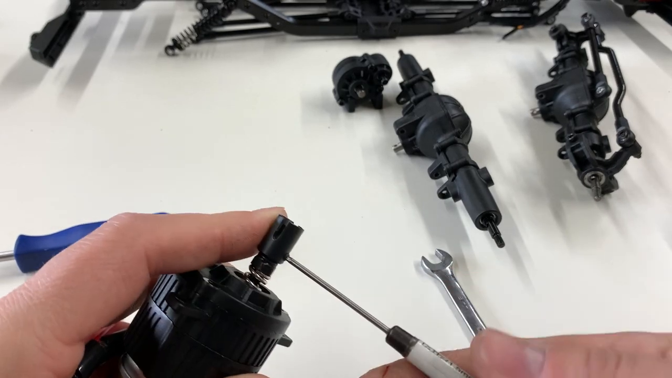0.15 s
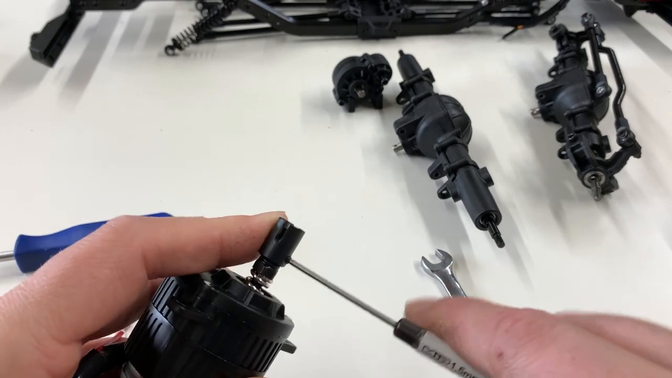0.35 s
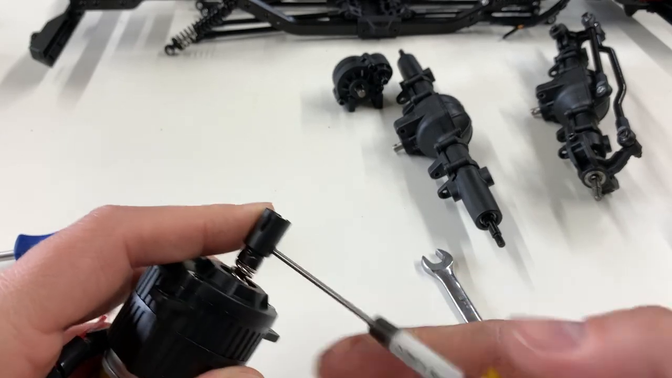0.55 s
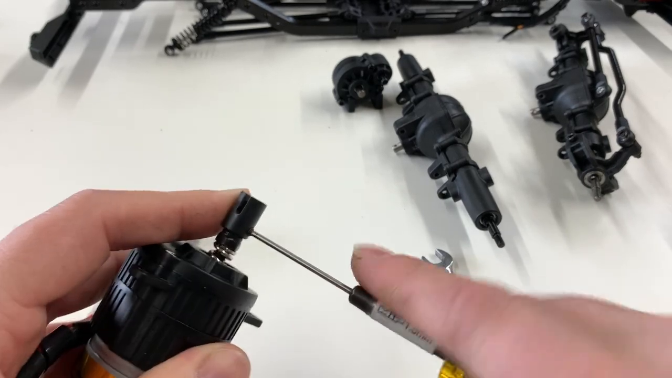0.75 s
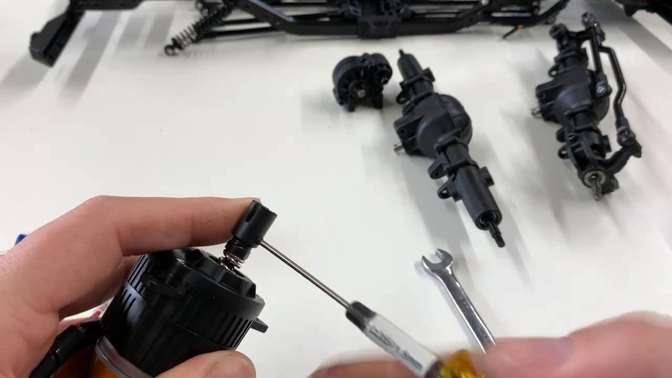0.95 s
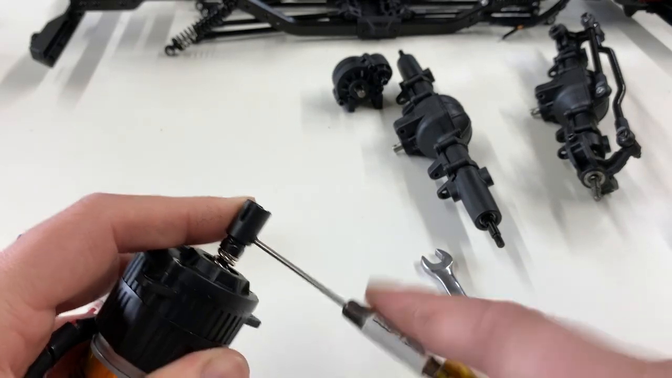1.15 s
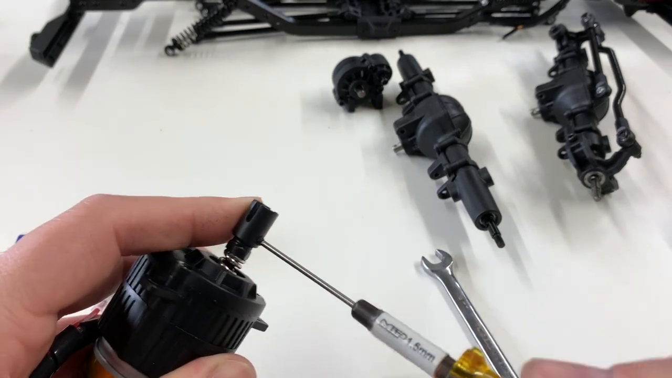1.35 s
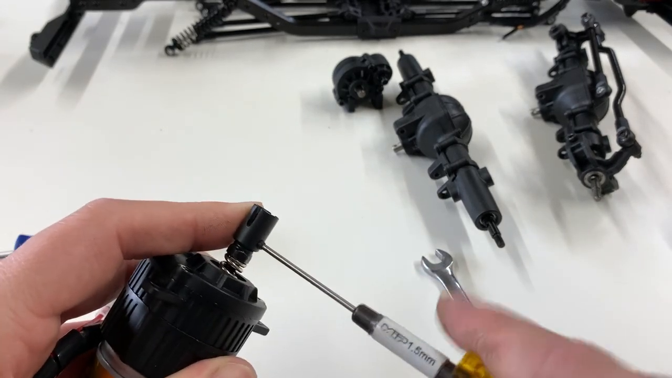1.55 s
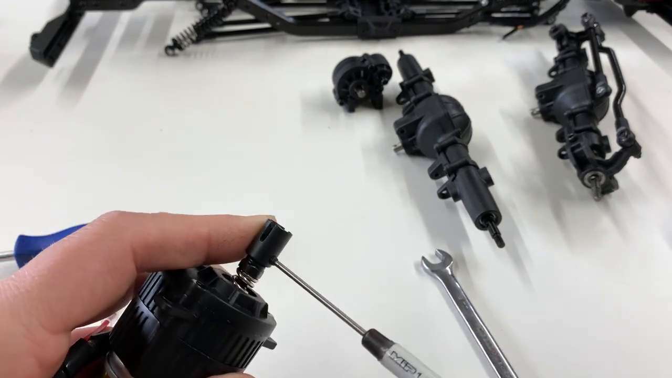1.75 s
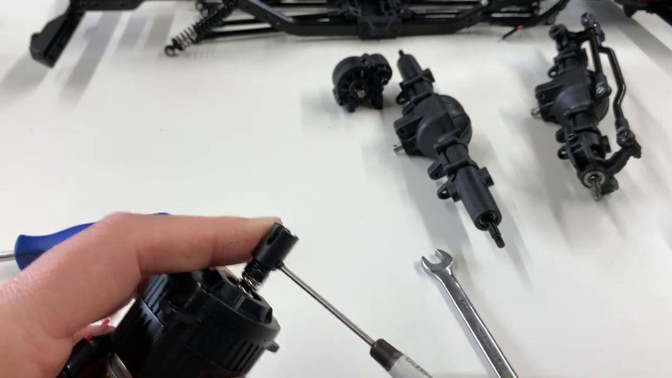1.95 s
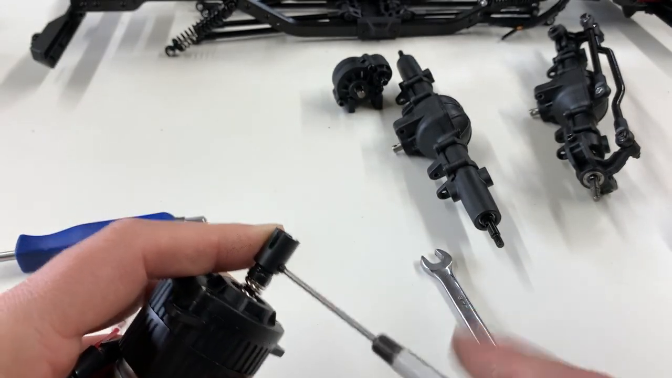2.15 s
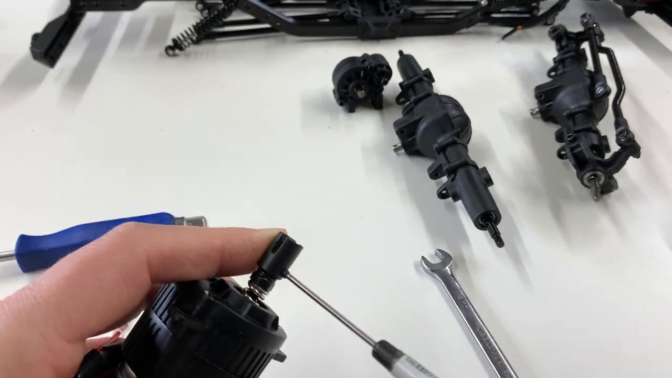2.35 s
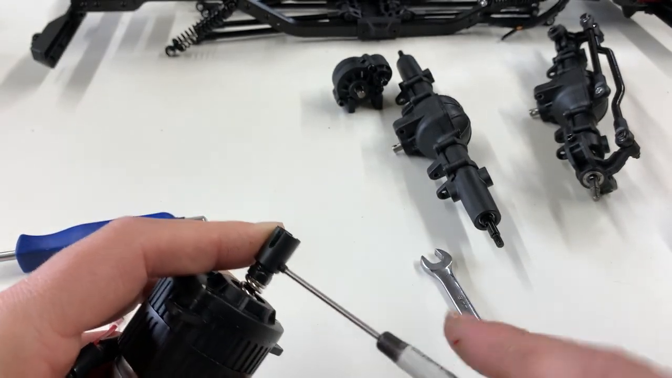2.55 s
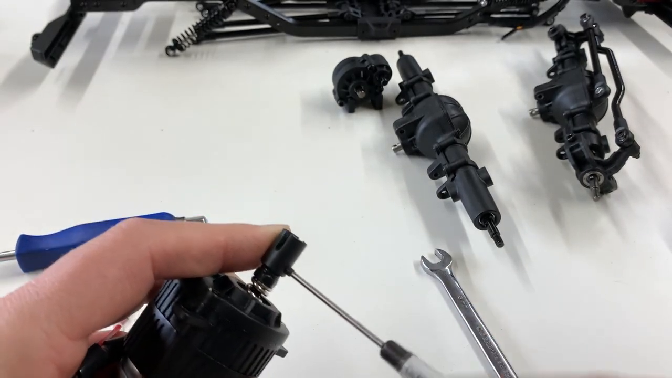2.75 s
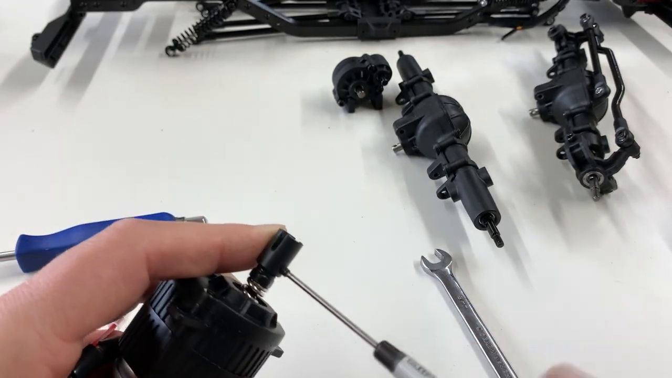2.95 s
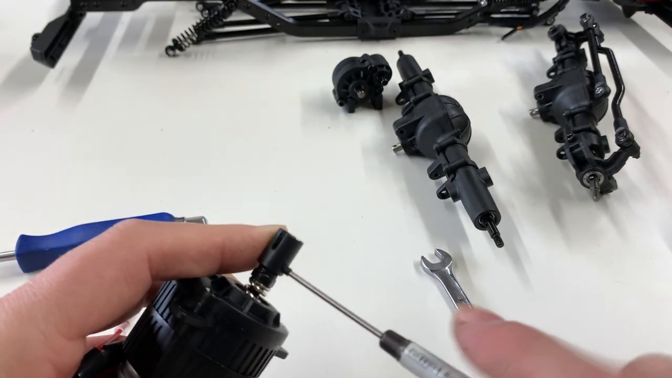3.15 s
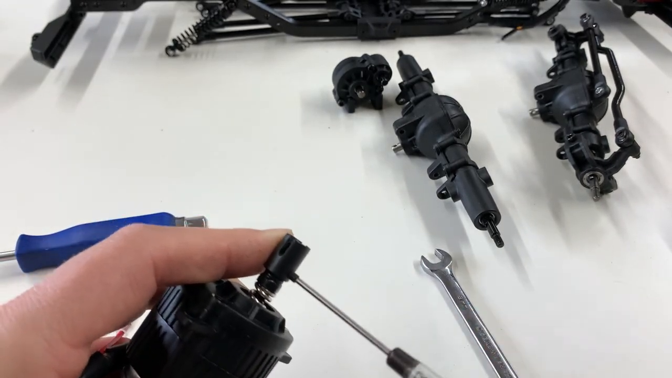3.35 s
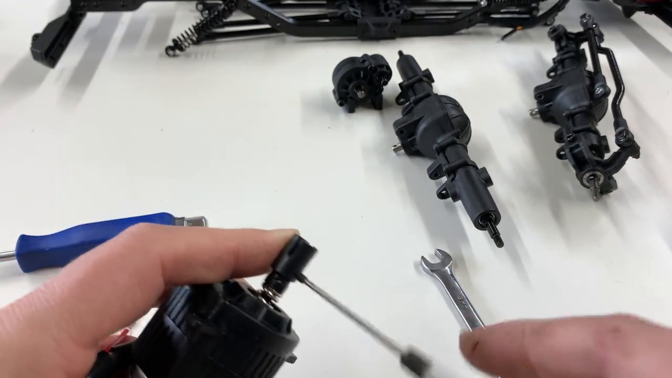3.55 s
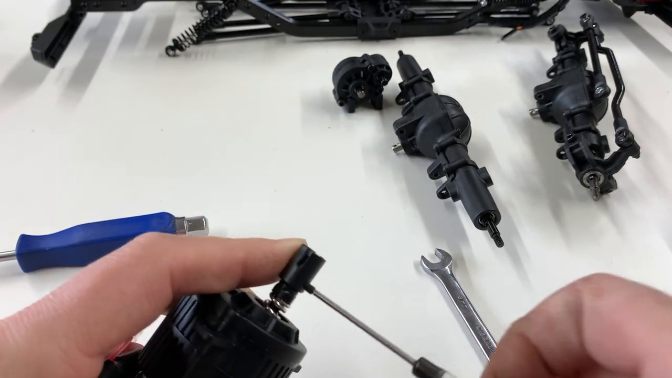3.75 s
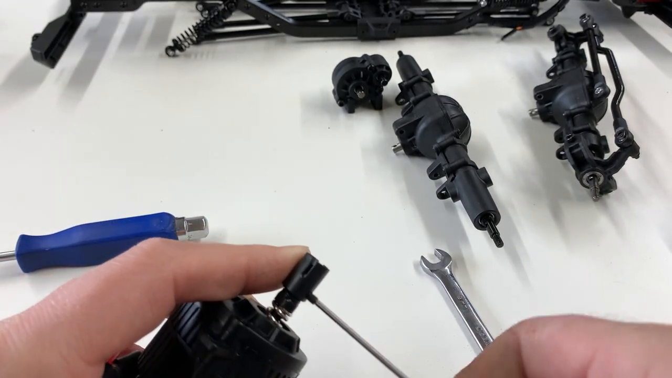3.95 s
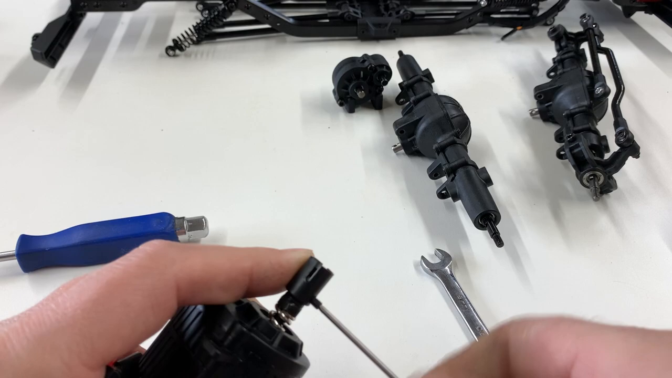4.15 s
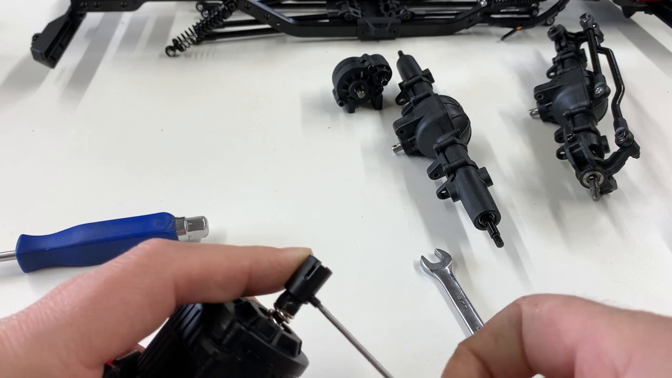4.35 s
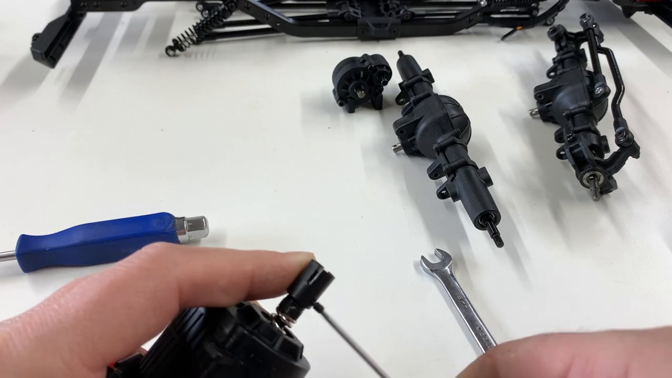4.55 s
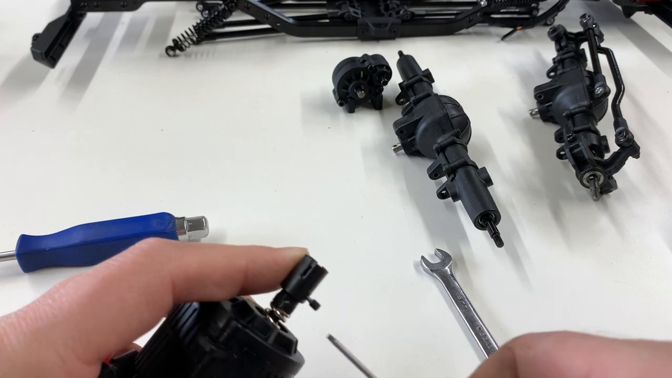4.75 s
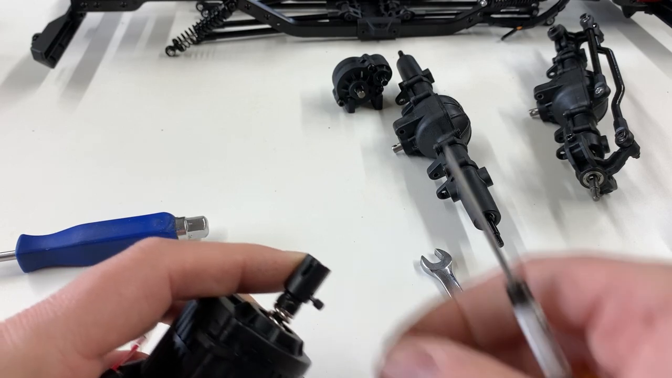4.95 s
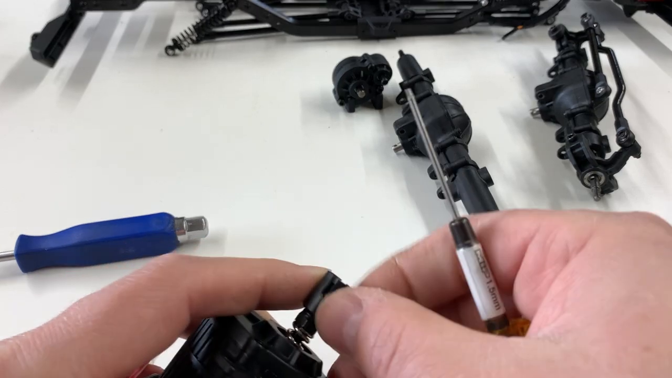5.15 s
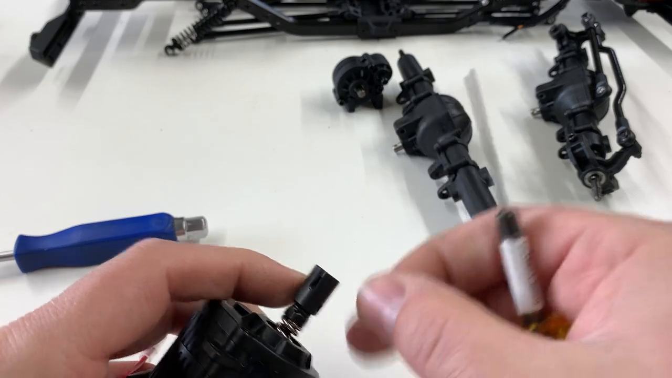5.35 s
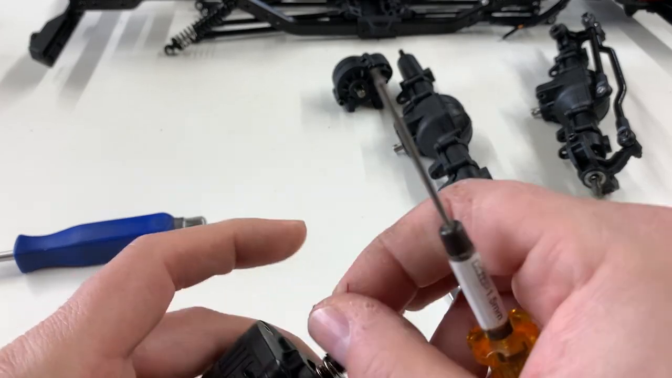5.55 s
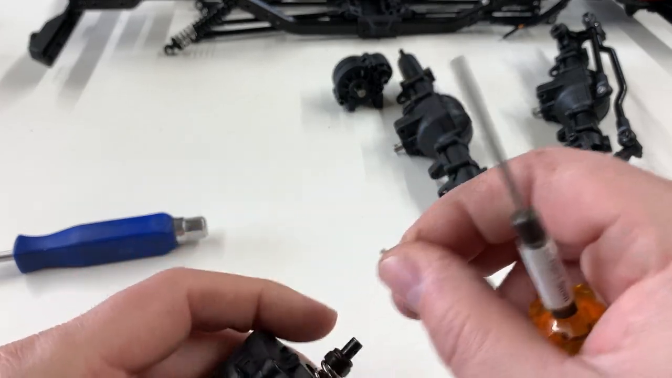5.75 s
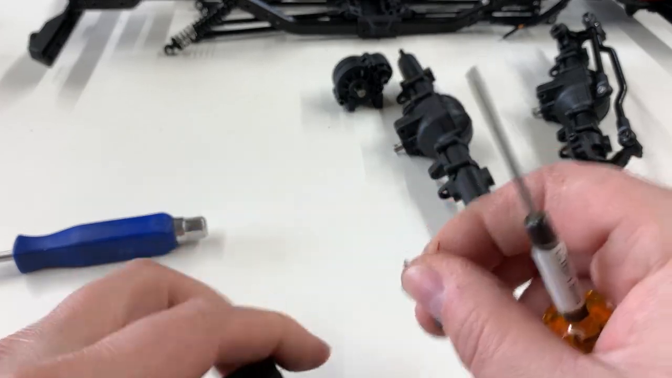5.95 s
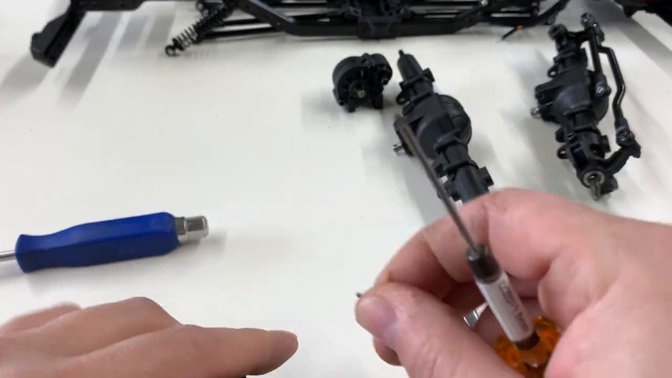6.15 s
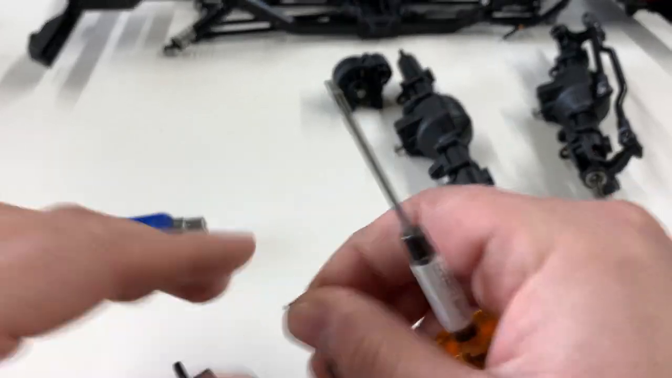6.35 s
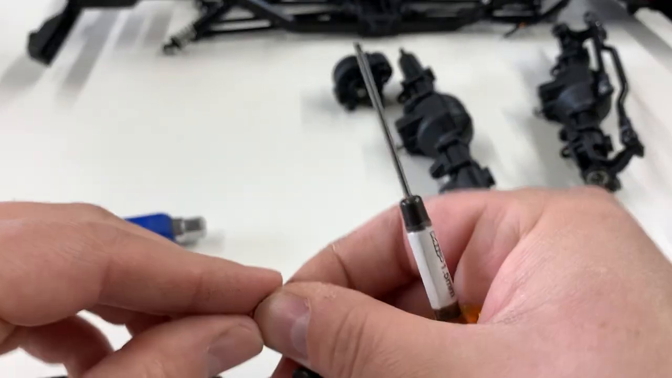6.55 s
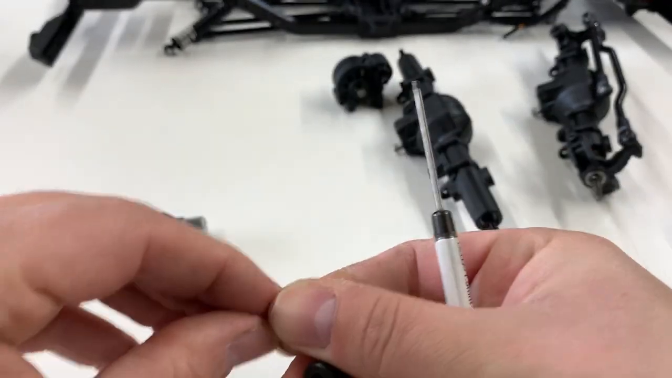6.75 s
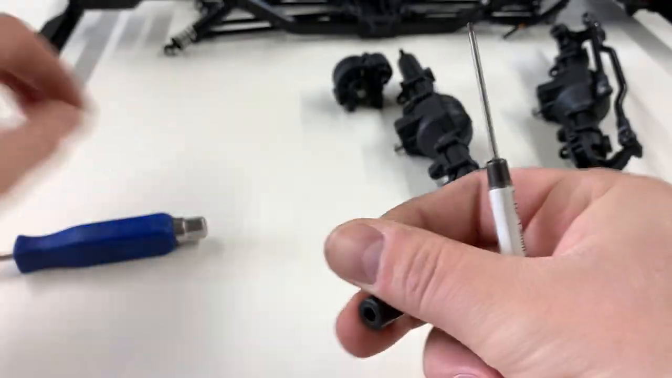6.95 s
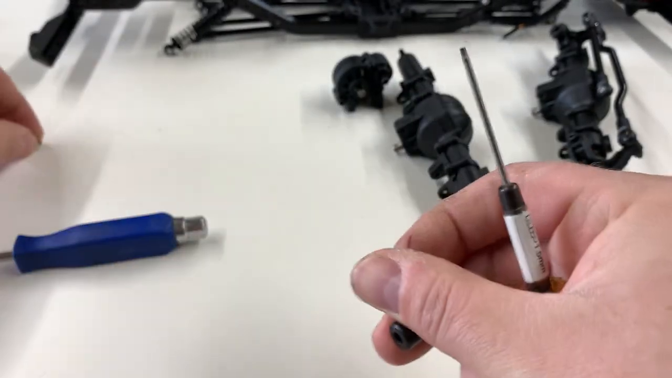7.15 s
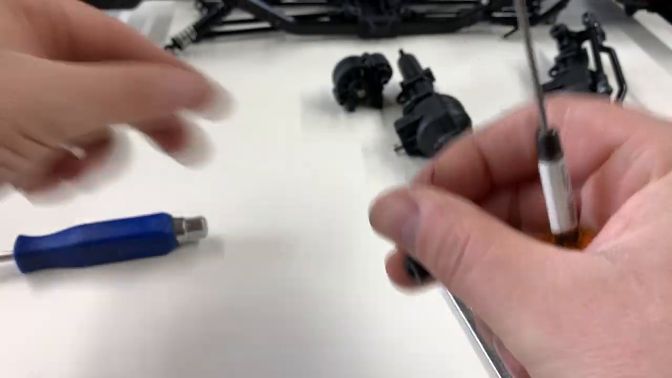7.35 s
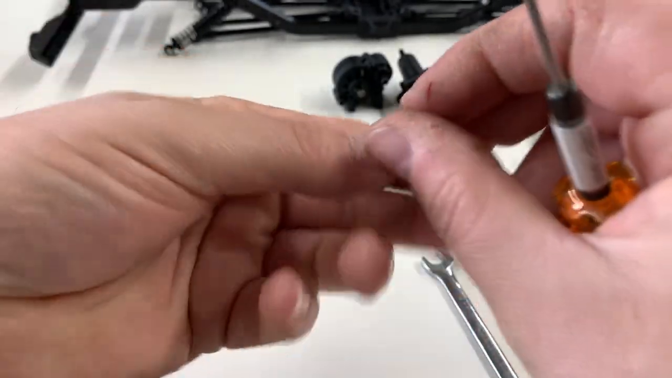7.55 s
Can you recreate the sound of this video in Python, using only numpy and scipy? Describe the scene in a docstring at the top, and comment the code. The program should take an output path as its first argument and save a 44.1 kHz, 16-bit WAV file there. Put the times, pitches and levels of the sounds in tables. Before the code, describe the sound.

A small hex driver backs a screw out of a plastic gearbox, giving light, irregular metallic clicks and then a few thin squeaks. The gearbox is set down on a workbench with a much louder clatter and knock. A smaller part follows, and the tiny screw drops and skitters. It sounds close, in a quiet room with a low hum.

```python
"""Unscrewing a small gearbox

In a quiet room a hex driver backs a tiny screw out of a plastic gearbox held over a workbench. The bit
clicks at each turn of the fingers and squeaks by stick-slip friction as it comes free. The gearbox is
set down with a clatter that excites the modes of the bench and of the steel parts on it; a small part
follows, then the screw drops and skitters. Faint tocks, rumble and hum lie underneath."""
import sys
import numpy as np
from scipy import signal
from scipy.fft import rfft, irfft
from scipy.io import wavfile
from scipy.ndimage import uniform_filter1d

SR = 44100
rng = np.random.default_rng(int(sys.argv[2]) if len(sys.argv) > 2 else 0)


def unload_wav(signal):
    """Save mono or channel-first audio to the path in sys.argv[1] as 16-bit WAV at rate SR, clipped to [-1, 1]."""
    wavfile.write(
        sys.argv[1],
        SR,
        np.round(np.clip(np.atleast_2d(signal).T, -1, 1) * 32767).astype(np.int16),
    )


N = 335160

# The bit takes up its play. Each row: start in seconds, relative steel and plastic levels in dB.
BIT_CLICKS = [(0.0975, -42.5, -66), (0.4377, -37.5, -57), (0.6115, -43, -62), (0.7891, -33, -60),
              (0.9039, -32.5, -53), (1.281, -39, -59), (1.4188, -44, -66), (1.5632, -59, -62.5),
              (1.6165, -37.5, -60), (1.6485, -56, -59), (1.7355, -43, -68), (1.8682, -35.5, -62),
              (2.04, -50.5, -67.5), (2.1265, -59, -61.5), (2.166, -41, -57.5), (2.3534, -47, -69),
              (2.521, -44, -59.5), (2.6632, -43, -67), (2.7205, -47.5, -61.5), (2.83, -49.5, -70),
              (2.851, -44.5, -59.5), (3.0041, -46, -71), (3.045, -54, -57.5), (3.056, -36, -60),
              (3.1435, -38.5, -62.5), (3.216, -59, -61), (3.49, -50, -61.5), (4.217, -57.5, -65.5),
              (5.0897, -55, -75), (5.33, -50.5, -60.5), (5.4729, -57.5, -64.5), (5.5407, -56.5, -61),
              (5.5628, -50.5, -65.5)]
# Harder contacts ring higher. Each row: steel minus plastic level in dB, ring frequency in Hz.
RING_PITCH = [(0, 6100), (6, 7600), (10, 9200), (25, 8950)]
# Spectrum of the held gearbox. Each row: frequency in Hz, gain in dB.
GEARBOX_SPECTRUM = [(500, -57), (1100, -6.5), (1500, 6), (2500, -2.5), (3800, 6), (6000, -0.5), (8000, -47),
                    (16000, -42)]
FIRM_DB = -42  # steel level of an ordinary click
def driver():
    """Impact excitation: after a light touch the bit strikes the screw, ringing steel and plastic."""
    out = np.zeros(N)
    for s, db, body_db in BIT_CLICKS:
        hz = np.interp(db - body_db, *np.transpose(RING_PITCH))
        steel = resonate_twice(contact(decay_s=0.00097), hz, 2230)
        top_ring = resonate_twice(contact(decay_s=0.0027), 13000, 3000)
        add(out, s, sized(steel, db - 7.5) + sized(top_ring, db - 15.5))
        body = tint(np.roll(contact(decay_s=0.0023), 64), GEARBOX_SPECTRUM)
        add(out, s - 64 / SR, sized(body, body_db))
        ping = resonate(contact(decay_s=0.0011), rng.uniform(3320, 4890), 190)  # shifts with the grip
        add(out, s, sized(ping, body_db - 4))
        touch = resonate(contact(decay_s=0.0025), 6100, 6600)
        add(out, s - rng.uniform(0.0052, 0.0083), sized(touch, db - 24.5))
    return out


# Slips of the threads and bit. Each row: start and length in seconds, relative level in dB,
# extra gain of the lowest shaft mode in dB.
SLIPS = [(4.135, .008, -71.5, -6), (4.322, 0.025, -72.5, 5), (4.459, 0.029, -62, -0.5),
         (4.5145, 0.0037, -60.5, -8), (4.522, 0.0048, -62, -6), (4.53, 0.013, -63, 2),
         (4.544, 0.0091, -60.5, 0), (4.565, 0.019, -63.5, 8), (5.54, 0.019, -66, 6)]
# Modes of the steel shaft. Each row: frequency and nominal width in Hz, relative level in dB.
SHAFT_MODES = [(4680, 170, 1.5), (5890, 170, 4), (9340, 320, 5), (13200, 1900, 6.5)]
def squeak():
    """Stick-slip friction: a stuck contact lets go and slides unevenly, driving the shaft's modes."""
    out = np.zeros(N)
    for s, length, db, low_db in SLIPS:
        count = max(int(length * SR), 8)
        fade = np.sqrt(1 - (np.arange(count) / count) ** 2)
        uneven = amp(4.3 * np.interp(clock(count) / .0012, np.arange(64), rng.standard_normal(64)))
        friction = np.pad(rng.standard_normal(count) * uneven * fade, (0, 600))
        modes = np.array([amp(mode_db) * evened(resonate_twice(friction, hz, 2 * width))
                          for hz, width, mode_db in SHAFT_MODES])
        shares_db = 3.4 * rng.standard_normal(len(modes))  # each slip favours other modes
        shares_db[0] += low_db
        add(out, s, amp(db - 1) * evened(amp(shares_db) @ modes))
    return out


# Plastic bumps and meets the bench. Each row: start in seconds, relative thud and click levels in dB,
# click frequency in Hz.
BLOWS = [(0.613, -58, -63, 7850), (5.9461, -26.5, -42.5, 9700), (6.0275, -17.5, -31, 8400),
         (6.0461, -36, -50, 9500), (6.049, -27.5, -43, 10100), (6.0614, -31.5, -47, 8800),
         (6.1481, -40, -50, 10100), (6.1584, -40, -38.5, 4970), (6.1677, -20.5, -41.5, 7200),
         (6.1874, -26, -39.5, 8500), (6.1984, -32, -45, 9800), (6.7809, -33, -52, 9360),
         (6.787, -40.5, -51.5, 9930), (6.7989, -39, -52.5, 9460), (6.8347, -54, -59, 9650),
         (7.012, -51.5, -69, 8900)]
# Modes of the bench top, the plastic shell, and the springs and steel parts on the bench.
# Each row: frequency in Hz, relative level in dB, time to decay by 60 dB in seconds.
BENCH_MODES = [(42.1, -20, 1), (59.7, -18, 0.47), (130, -8, 0.044), (187.6, -14, 0.11), (248, -25.5, 0.13),
               (344.3, -12, 0.14), (403.5, -1.5, 0.045), (464.3, -10, 0.089)]
SHELL_MODES = [(633, -18, 0.15), (705, -13, 0.061), (803, -20, 0.059), (898, -18, 0.099),
               (1296, -24.5, 0.12), (1452, -17, 0.06), (1509, -21, 0.062), (1650, -22.5, 0.063),
               (1964, -25, 0.065), (2120, -26, 0.033), (2440, -36, 0.039)]
PART_MODES = [(345, 2.5, 1.28), (399, -5.5, 2.2), (880, -21, 0.57), (974, -29.5, 4.6), (987, -13, 0.97),
              (1764, -13, 0.67), (1910, -18, .9), (2130, -25, 0.89), (2156, -11.5, 0.7)]
# Spectra of the rattling gears and the parts' many weaker modes. Each row: frequency in Hz, gain in dB.
GEAR_SPECTRUM = [(100, -1.5), (380, 13), (580, 3), (900, 6.5), (1500, -1), (2200, 1), (3000, -12.5),
                 (5000, -12.5), (9000, -29), (16000, -45)]
HAZE_SPECTRUM = [(150, -37), (280, 6.5), (390, 4.5), (540, -5.5), (780, -5), (1000, -2.5), (1200, -22),
                 (1500, -15), (1700, -7.5), (2150, -12), (2700, -21.5), (5000, -33)]
def clatter():
    """Modal superposition: each blow and its lighter rebound ring the bench, shell and loose parts."""
    impulses, rattle, clicks = np.zeros((3, N))
    t = clock(8192)
    rebounds = [(s + 0.011 * rng.uniform(.8, 1.2), thud_db - 17, click_db - 9.5, hz)
                for s, thud_db, click_db, hz in BLOWS]
    for s, thud_db, click_db, hz in BLOWS + rebounds:
        add(impulses, s, amp([thud_db]))
        add(rattle, s, amp(thud_db - 13.5) * noise(GEAR_SPECTRUM, len(t)) * np.exp(-t / 0.013))
        add(clicks, s, sized(resonate(contact(decay_s=0.0016), hz, 3400), click_db))
        output_shaft = resonate(contact(decay_s=0.022), 9050, 480)
        add(clicks, s, sized(output_shaft, click_db - 10.5))
    shell = ring(SHELL_MODES[::2], SR) - ring(SHELL_MODES[1::2], SR)  # neighbours in antiphase
    bench = ring(BENCH_MODES, SR)
    thuds = signal.oaconvolve(impulses, amp(-2.5) * shell - amp(-1.13) * bench)[:N]
    t = clock(2 * SR)
    haze = noise(HAZE_SPECTRUM, len(t)) * np.exp(-t / 0.18)
    parts = signal.oaconvolve(impulses, amp(-34.5) * (ring(PART_MODES, len(t)) + haze))[:N]
    return thuds + parts + rattle, clicks


def screw(drop_s=7.0837, drop_db=-51.5, bounce_s=0.018, loss_db=1.4):
    """Inelastic collisions: the screw taps the bench in weakening bounces, then patters to rest."""
    out = np.zeros(N)
    for k, (late, uneven) in enumerate(rng.standard_normal((7, 2))):
        s = drop_s + k * bounce_s + 0.001 * late
        db = drop_db - k * loss_db + 1.3 * uneven
        bounce = resonate(resonate(contact(decay_s=0.0015), 11000, 9300), 11000, 9400)
        tap = resonate(contact(decay_s=0.0025), 1500, 1400)
        add(out, s, sized(bounce, db) + sized(tap, db - 12.5))
    t = clock(SR // 2)
    patter = sparse(len(t), per_s=3500) * np.exp(-t / 0.084)
    add(out, drop_s + bounce_s, amp(-72.5) * evened(resonate(patter, 10500, 4000)))
    return out


# The fingers shift their grip. Each row: centre and length in seconds, relative level in dB.
GRIP_SHIFTS = [(1.076, 0.075, -72.5), (1.204, 0.082, -71.5), (1.562, 0.063, -70), (5.807, 0.073, -77),
               (6.666, 0.17, -74)]
# Spectrum of rubbing skin. Each row: frequency in Hz, gain in dB.
SKIN_SPECTRUM = [(300, -28), (1400, -2.5), (2200, -4), (3200, -12), (6500, -7.5), (9500, 2), (12000, -3),
                 (16000, -5.5)]
def fingers(start_s=0.3, end_s=3.3, lag_s=0.021, stroke_s=0.12):
    """Sliding friction: skin on the handle hisses and crackles with each stroke and change of grip."""
    strokes = [(s + lag_s, stroke_s, -77 + 0.15 * (db - FIRM_DB))  # firmer with the louder clicks
               for s, db, _ in BIT_CLICKS if start_s < s < end_s]
    level = np.sqrt(sum((amp(db) * swell(s, length)) ** 2 for s, length, db in strokes + GRIP_SHIFTS))
    grains = rng.standard_normal(N) * amp(7.2 * rng.standard_normal(N))
    crackle = sparse(N, per_s=110)  # skin catches and lets go
    drag = amp(2.8 * wander(N, span=700) + 0.1)
    rubbing = tint(evened(grains) + amp(-3.5) * evened(crackle), SKIN_SPECTRUM)
    return level * drag * evened(rubbing)


def creaks(start_s, end_s, per_s, db):
    """Random impulse excitation: the gripped gearbox gives tiny dull ticks."""
    out = np.zeros(N)
    for place, softness in rng.random((int(per_s * (end_s - start_s)), 2)):
        tick = tint(np.roll(contact(decay_s=0.0024), 64), GEARBOX_SPECTRUM)
        add(out, start_s + place * (end_s - start_s), sized(tick, db - 8 * softness))
    return out


# Squeaks as the parts change hands. Each row: start and length in seconds, level in dB, top pitch in Hz.
THIN_SQUEAKS = [(6.34, 0.1, -86, 10800), (6.44, 0.084, -80, 12680), (6.565, 0.064, -81, 13100)]
def chirps(pitch_dip=0.045):
    """Frequency and amplitude modulation: a near-pure tone's pitch and level arch together."""
    out = np.zeros(N)
    for s, length, db, top_hz in THIN_SQUEAKS:
        t = np.arange(0, length, 1 / SR)
        arch = np.sin(np.pi * t / length)
        hz = top_hz * (1 - pitch_dip * (1 - arch) + 0.004 * wander(len(t), span=60))
        add(out, s, amp(db) * np.sqrt(abs(arch)) * np.sin(2 * np.pi * np.cumsum(hz) / SR))
    return out


# Faint whines of the turning. Each row: centre and length in seconds, level in dB, frequency in Hz.
TURNING_WHINES = [(0.609, 0.014, -68.5, 2660), (0.703, 0.15, -78, 2670), (1.00, 0.17, -86.5, 2530),
                  (1.233, 0.12, -84, 2090), (1.864, 0.16, -79.5, 2100)]
def whine():
    """Forced resonance: light friction feeds one narrow band at a time."""
    friction = rng.standard_normal(N)
    return sum(amp(db) * swell(s, length) * evened(resonate_twice(friction, hz, 170))
               for s, length, db, hz in TURNING_WHINES)


# Even runs of faint hollow tocks, probably a lens drive. Each row: first and last time in seconds,
# count, relative level in dB.
TOCK_RUNS = [(0.13, 0.323, 3, -65), (0.483, 0.547, 2, -59.5), (0.808, 0.806, 1, -59),
             (1.059, 1.241, 2, -59.5), (1.604, 1.78, 3, -59.5), (2.103, 2.372, 3, -58),
             (2.476, 2.553, 2, -58.5), (2.661, 2.771, 2, -55.5), (2.911, 3.2, 3, -62),
             (3.398, 3.57, 3, -59), (3.7, 3.824, 2, -57.5), (3.906, 3.98, 2, -60.5), (4.078, 4.5, 5, -57.5),
             (4.609, 4.786, 3, -62.5), (5.683, 5.863, 3, -62)]
def tocks():
    """Damped free vibration: each short push rings three low modes, which are choked after 13 ms."""
    out, t = np.zeros(N), clock(2048)
    tock = ring([(677, -4.5, 0.25), (1012, -5.5, 0.12), (797, -2.5, 0.02)], len(t))
    tock *= np.exp(-np.maximum(t - .013, 0) / 0.0055)
    for first, last, count, db in TOCK_RUNS:
        for s in np.linspace(first, last, round(count)):
            add(out, s, amp(db - 3.5 + rng.standard_normal()) * tock)
    return out


# Course of the deep rumble. Each row: time in seconds, level in dB.
RUMBLE_LEVELS = [(0, -73), (0.6, -53.5), (1.3, -47), (1.8, -50), (2.6, -49.5), (3.2, -64), (5.3, -77),
                 (7.6, -60.5)]
# Its spectrum. Each row: frequency in Hz, gain in dB.
RUMBLE_SPECTRUM = [(4, -7.5), (11, -4), (20, -2), (35, -18.5), (60, -37.5), (200, -66.5)]
def rumble():
    """Amplitude-modulated noise: a deep rumble swells while the hands are busiest."""
    return amp(np.interp(clock(N), *np.transpose(RUMBLE_LEVELS))) * noise(RUMBLE_SPECTRUM, N)


# Machinery in the building. Each row: frequency and bandwidth in Hz, level in dB.
MACHINE_HUM = [(40.1, 5.3, -61.5), (67.35, 5, -67)]
# Spectrum of the low drone and soft hiss. Each row: frequency in Hz, gain in dB.
AIR_SPECTRUM = [(8, 3), (20, -1), (30, -5.5), (45, -12), (60, -19.5), (100, -22.5), (158, -28),
                (446, -39.5), (900, -42), (1300, -46.5), (2900, -49.5), (4500, -50.5), (9000, -50.5),
                (16000, -49.5)]
def air():
    """Stationary noise: narrow bands of machine hum stand on the building's broadband drone."""
    hum = sum(amp(db) * evened(resonate(rng.standard_normal(N), hz, width))
              for hz, width, db in MACHINE_HUM)
    return hum + amp(-53.5) * noise(AIR_SPECTRUM, N)


# Decay of the small room. Each row: frequency in Hz, time to decay by 60 dB in seconds.
REVERB_TIMES = [(100, 0.82), (500, 0.27), (2000, 0.35), (9000, 0.35), (16000, 0.53)]
def room(x):
    """Reverberation: sparse reflections follow a short gap, each band dying at its own rate."""
    t = clock(SR)
    onset = (.18 + .82 * (t > .0125)) * (t > .004)
    hz, times, bands = signal.stft(sparse(SR, per_s=9000) * onset, SR, nperseg=256)
    decay = amp(-60 * times / read(REVERB_TIMES, hz)[:, None])
    tail = signal.istft(bands * decay, SR, nperseg=256)[1]
    return signal.oaconvolve(x, tail / np.linalg.norm(tail))[:N]


def contact(decay_s, rise_s=0.00033):
    """Rough contact: two faces meet in a brief chatter of tiny impacts."""
    t = clock(2048)
    return rng.standard_normal(len(t)) * np.exp(-t / decay_s) * (1 - np.exp(-t / rise_s))


def ring(modes, size):
    """Impulse response: a sum of exponentially decaying modes."""
    t = clock(size)
    return sum(amp(db - 60 * t / t60) * np.sin(2 * np.pi * hz * t) for hz, db, t60 in modes)


def resonate(x, hz, width_hz):
    """Second-order resonance with a peak gain of 1."""
    hz = min(hz, SR * .45)
    return signal.lfilter(*signal.iirpeak(hz, hz / width_hz, SR), x)


def resonate_twice(x, hz, width_hz):
    """Two equal resonances in cascade give steeper skirts."""
    return resonate(resonate(x, hz, width_hz), hz, width_hz)


def tint(x, spectrum):
    """Zero-phase filtering by a curve of (Hz, dB) points."""
    return irfft(rfft(x) * amp(read(spectrum, np.fft.rfftfreq(len(x), 1 / SR))), len(x))


def noise(spectrum, size):
    """Coloured noise of unit rms."""
    return evened(tint(rng.standard_normal(size), spectrum))


def sparse(size, per_s):
    """Shot noise: impulses of random time and strength."""
    return rng.standard_normal(size) * (rng.random(size) < per_s / SR)


def wander(size, span):
    """Slow fluctuation of unit rms: noise averaged over span samples."""
    return evened(uniform_filter1d(rng.standard_normal(size), span))


def swell(s, length):
    """Gaussian envelope centred on the time s."""
    return np.exp(-(2 * (clock(N) - s) / length) ** 2)


def sized(x, db):
    """Scales a click to the energy of 2 ms at this level."""
    return amp(db) * x * np.sqrt(.002 * SR) / np.linalg.norm(x)


def evened(x):
    """Scales x to unit rms."""
    return x / np.sqrt(np.mean(x ** 2) + 1e-30)


def amp(db):
    """Decibels to amplitude ratio."""
    return 10 ** (np.asarray(db) / 20)


def read(points, hz):
    """Interpolates (Hz, value) points on a log-frequency axis."""
    f, value = np.transpose(points)
    return np.interp(np.log(hz + 1), np.log(f + 1), value)


def clock(size):
    """Sample times in seconds."""
    return np.arange(size) / SR


def add(mix, s, sound):
    """Mixes a sound in at the time s."""
    part = mix[round(s * SR):][:len(sound)]
    part += sound[:len(part)]


def scene():
    """Superposition: direct sound from hands and bench adds to its reflections and the background."""
    thuds, clicks = clatter()
    held = driver() + squeak() + creaks(start_s=1.4, end_s=3.4, per_s=11, db=-66)
    dropped = clicks + screw()
    reflections = room(amp(-18.5) * held + amp(-14.5) * dropped + amp(-13) * thuds)
    foreground = held + dropped + thuds + reflections + fingers() + chirps() + whine()
    return (foreground + tocks() + rumble() + air())[None]


# Treble response of the microphone. Each row: frequency in Hz, gain in dB.
MIC_RESPONSE = [(10000, 0), (13500, -.5), (16000, -5)]
def record(dry, cutoff_hz=16100):
    """Low-pass filtering: the microphone softens the treble, then a steep band limit ends it."""
    band_limit = signal.firwin(255, cutoff_hz, window=("kaiser", 7), fs=SR)
    return signal.oaconvolve(tint(dry[0], MIC_RESPONSE), band_limit, "same")[None]


dry = scene()
out = record(dry)
unload_wav(out)
```